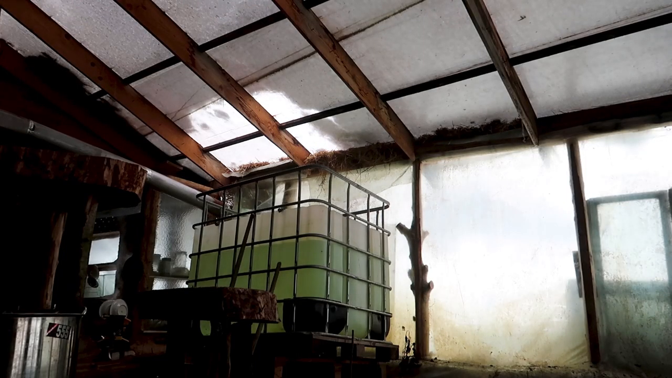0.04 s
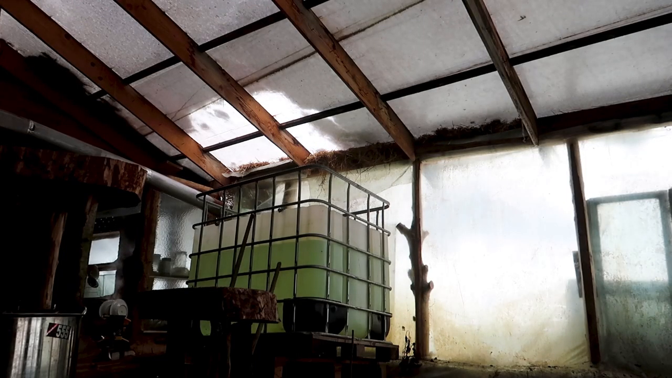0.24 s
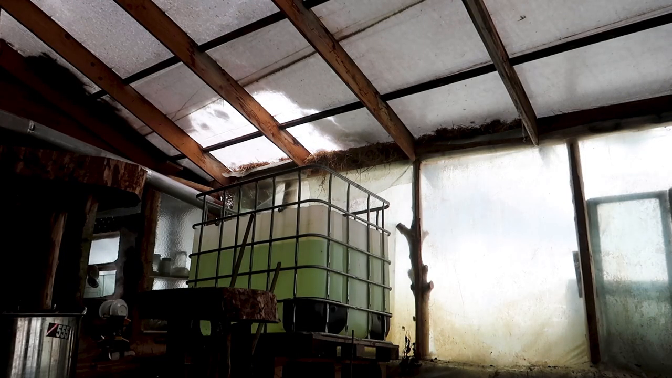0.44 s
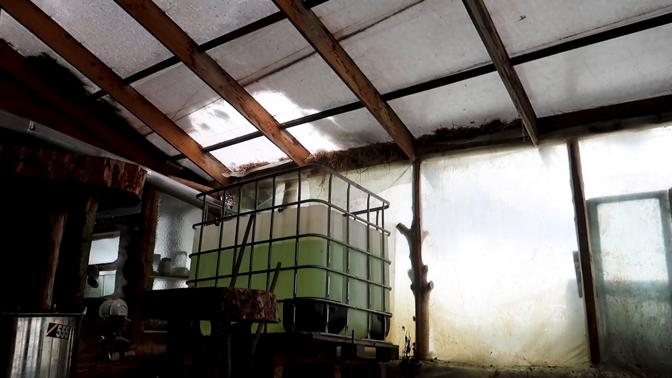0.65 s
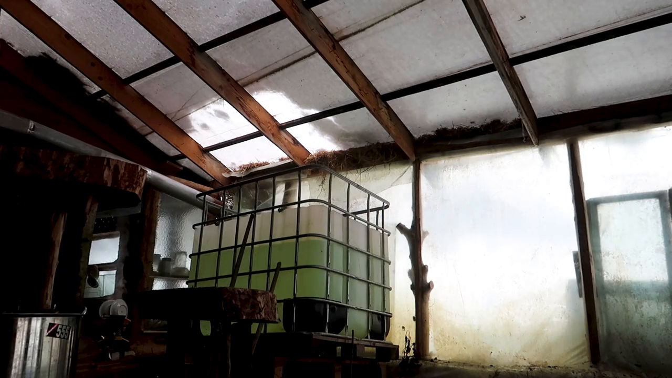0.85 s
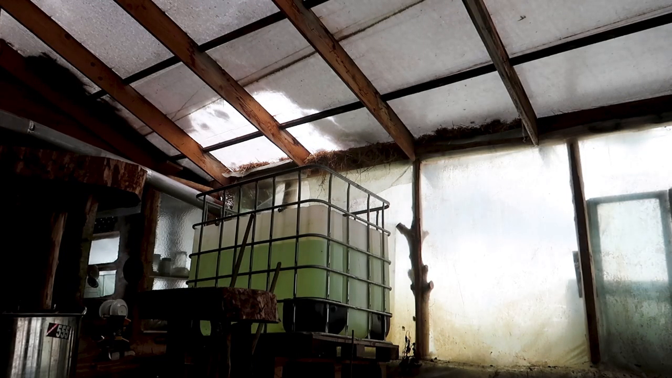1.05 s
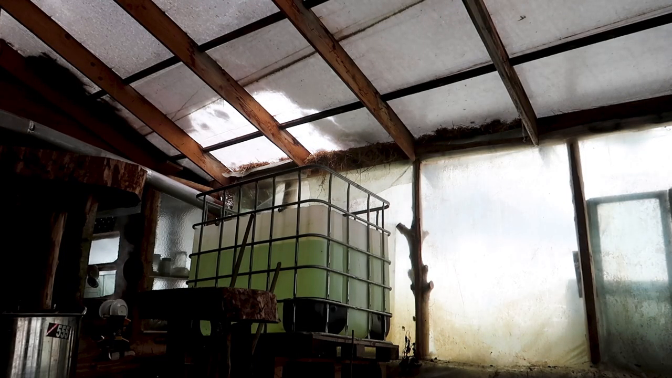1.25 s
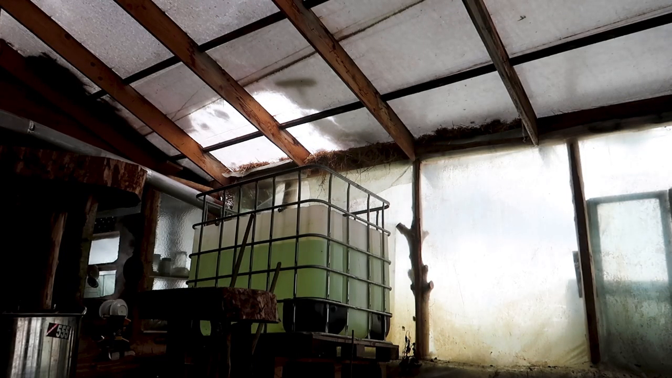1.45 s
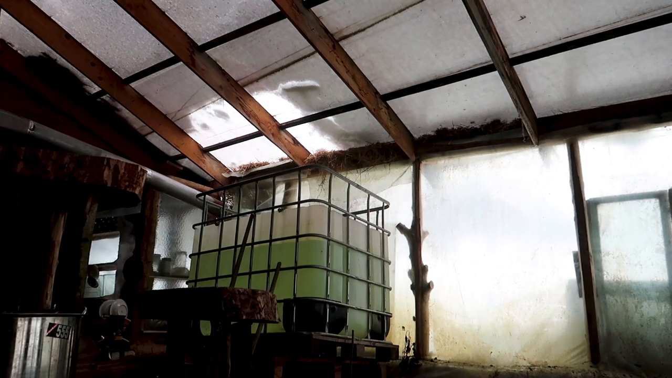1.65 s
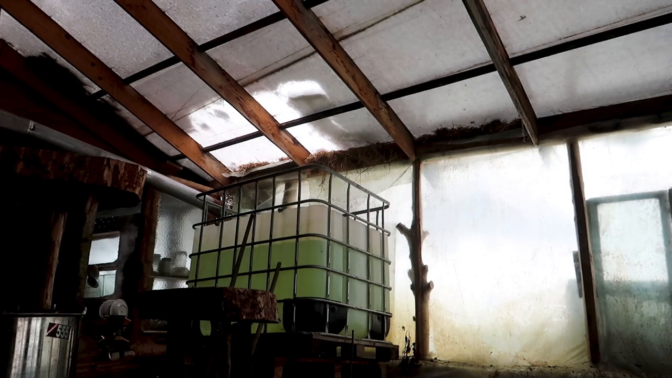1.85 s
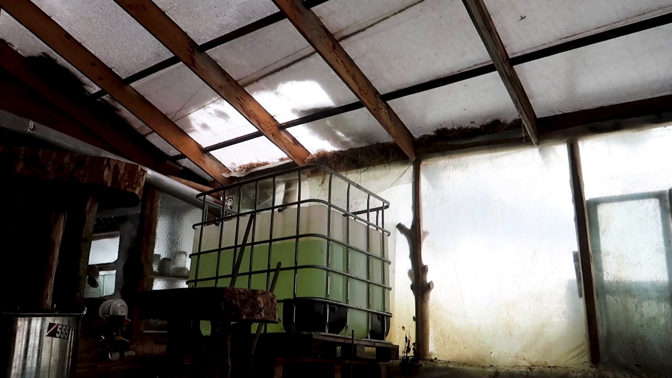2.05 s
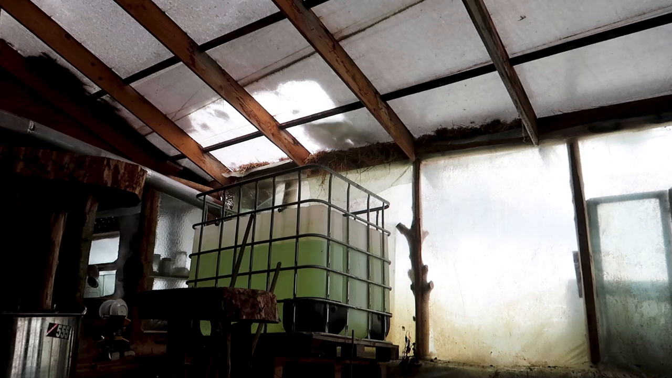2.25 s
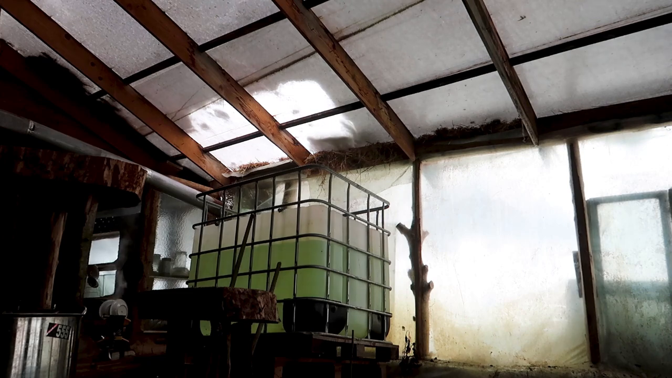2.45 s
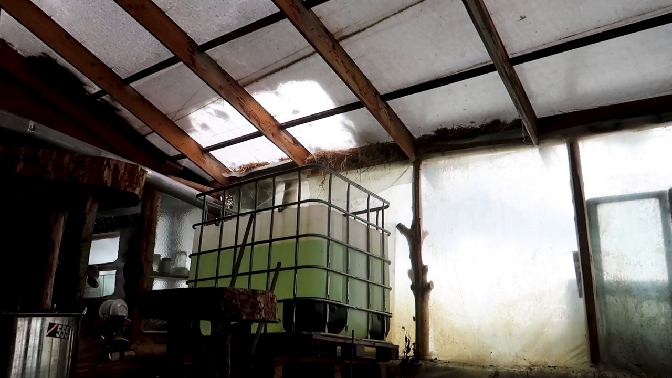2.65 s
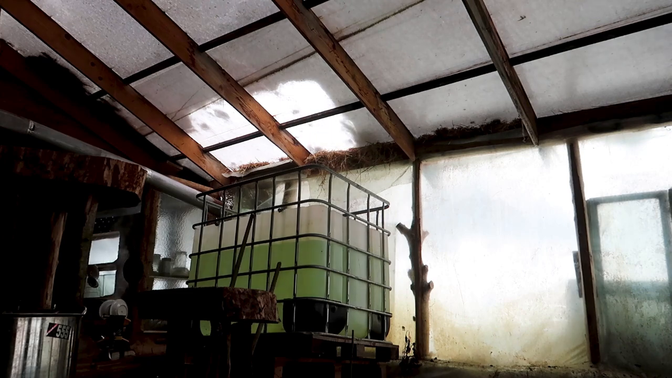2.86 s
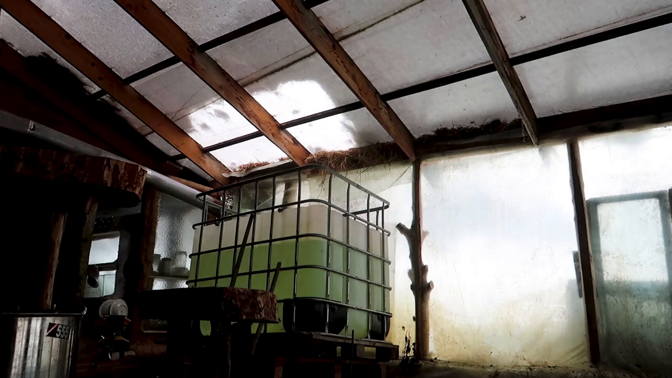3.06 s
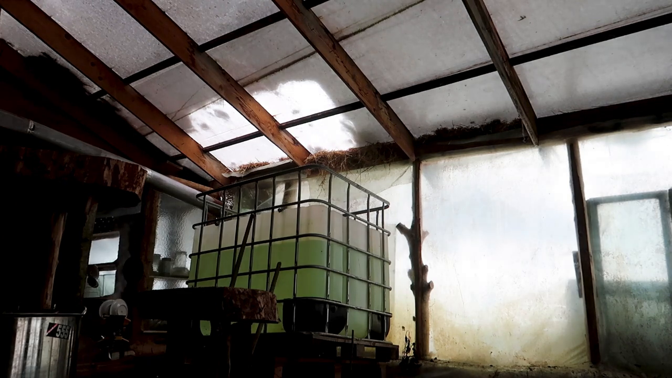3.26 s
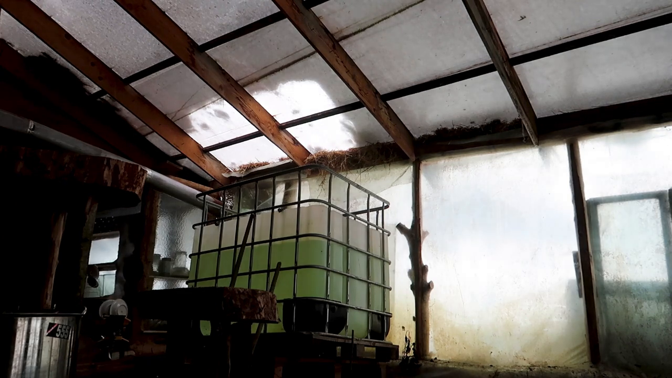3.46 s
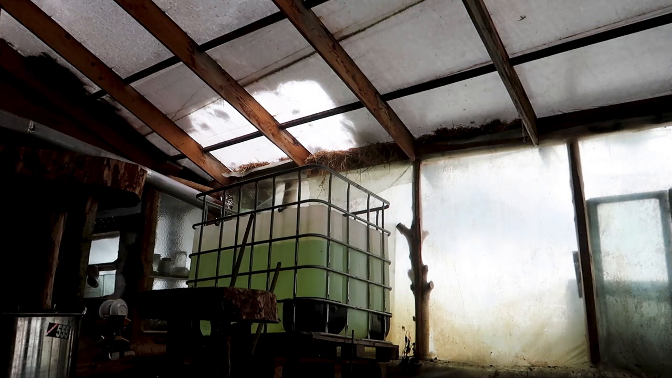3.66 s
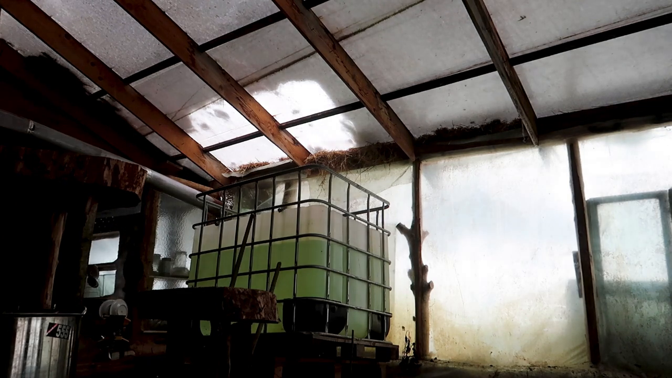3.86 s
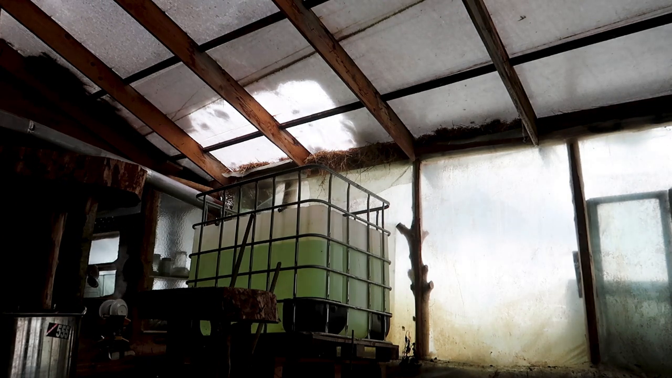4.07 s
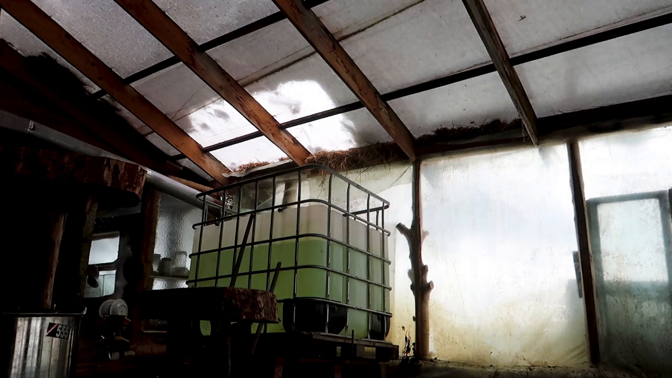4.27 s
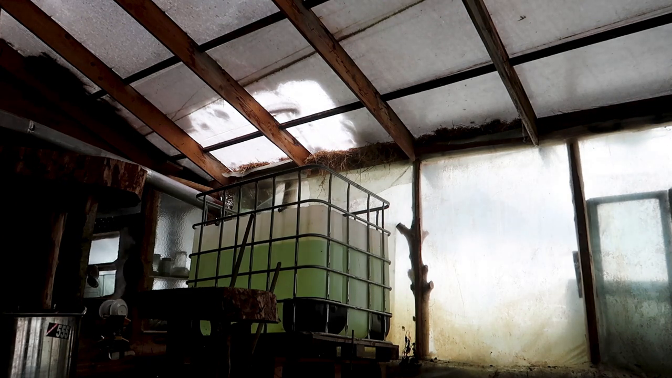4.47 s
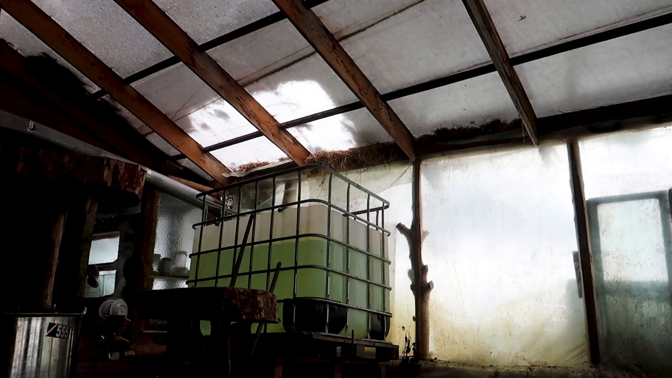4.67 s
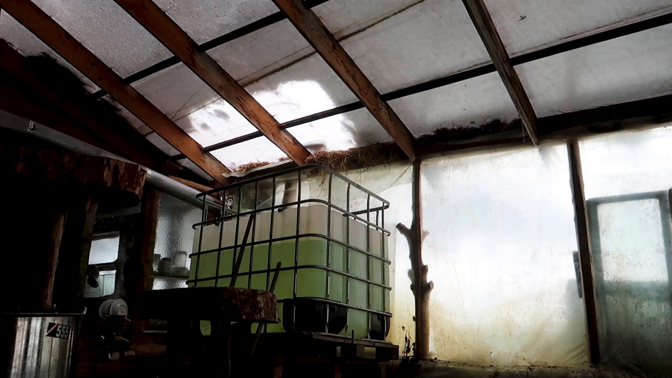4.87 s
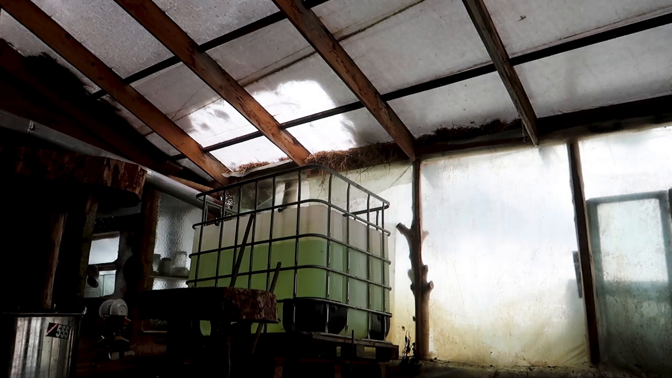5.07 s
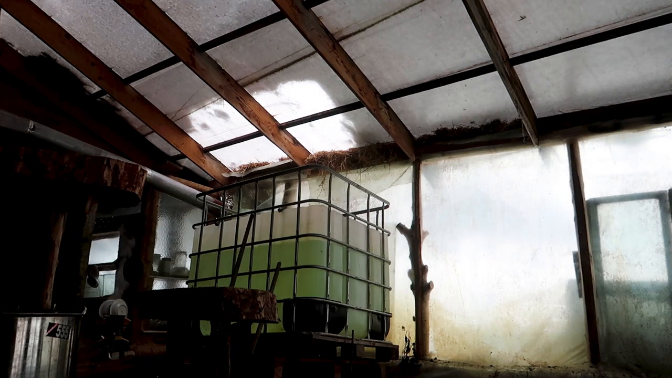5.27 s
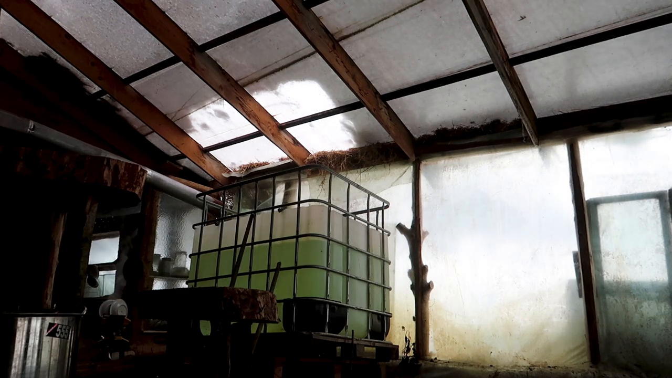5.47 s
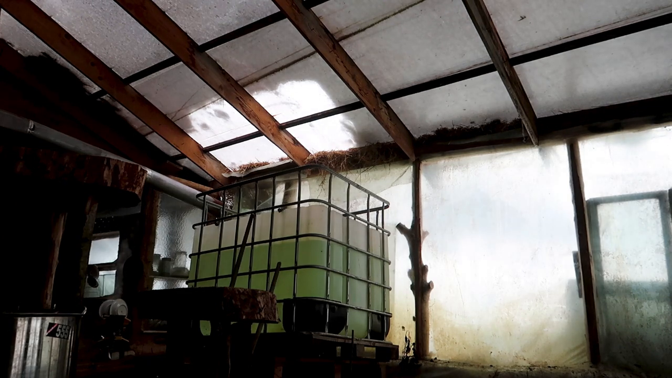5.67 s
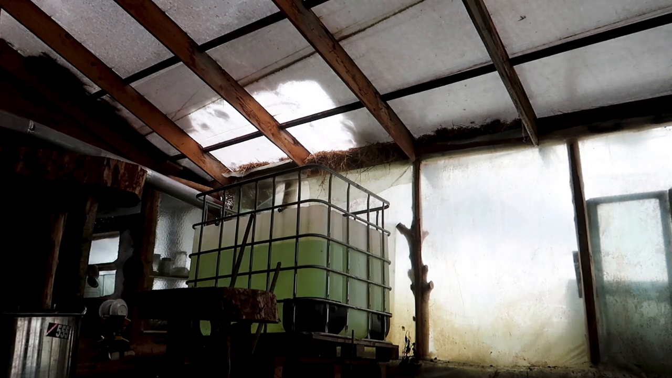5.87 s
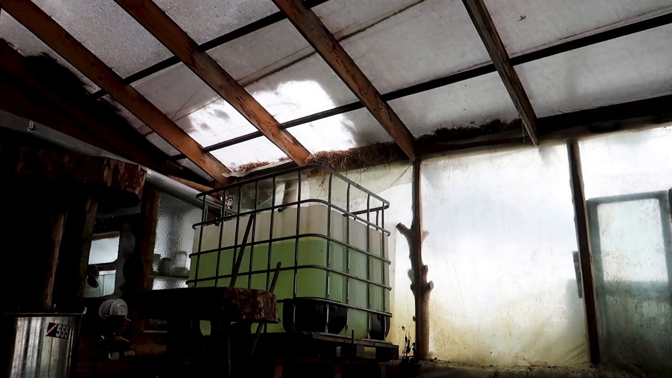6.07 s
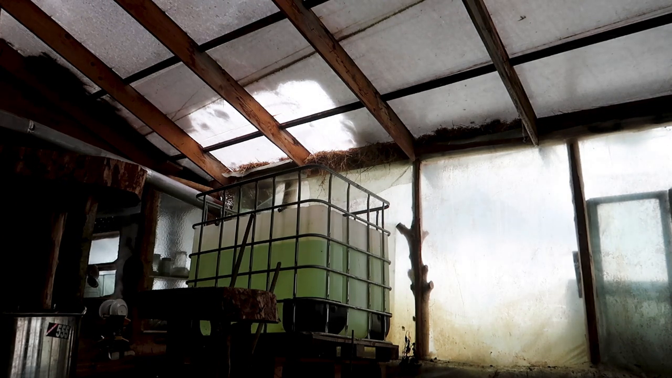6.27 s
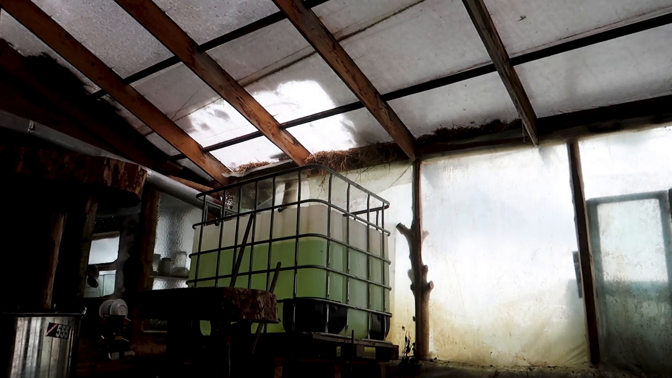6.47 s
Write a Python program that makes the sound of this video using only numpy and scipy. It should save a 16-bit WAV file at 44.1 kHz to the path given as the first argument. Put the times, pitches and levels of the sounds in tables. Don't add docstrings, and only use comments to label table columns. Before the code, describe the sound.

A tool knocks snow-laden roof panels, crust crunches, and slabs of snow scrape down with a grainy, fizzing hiss over hollow panel rumble.

```python
import sys
import numpy as np
from scipy import signal
from scipy.fft import rfft, irfft
from scipy.io import wavfile
from scipy.ndimage import uniform_filter1d

SR = 44100
rng = np.random.default_rng(int(sys.argv[2]) if len(sys.argv) > 2 else 0)


def digitize_waveform(pressure):
    field = np.atleast_2d(pressure).T
    bounded = np.clip(field, -1, 1)
    quanta = np.round(bounded * 32767).astype(np.int16)
    wavfile.write(sys.argv[1], SR, quanta)


def undo_db(level):
    steps = np.asarray(level, float) / 20
    return 10 ** steps


N = 287205
HZ = np.fft.rfftfreq(N, 1 / SR)


def evened(x):
    return x / np.sqrt(np.mean(x ** 2) + 1e-20)


def read(points, hz, axis=1):
    table = np.transpose(points)
    return np.interp(np.log(hz + 1), np.log(table[0] + 1), table[axis])


def add(mix, s, sound):
    part = mix[..., max(round(s * SR), 0):][..., :sound.shape[-1]]
    part += sound[..., :part.shape[-1]]


def mode(f, hz, width_hz):
    return 1 / (1 + 2j * (f - hz) / width_hz)


def shaped(x, gain):
    size = x.shape[-1]
    return irfft(rfft(x) * gain(np.fft.rfftfreq(size, 1 / SR)), size)


def panel(f):
    # (centre [Hz], width [Hz], level over the plain panel [dB])
    panel_modes = [(175.8, 8, 5.5), (246, 14, -3), (313.6, 14, 0), (350, 10.5, 0.5), (423.7, 12, 1.5),
                   (481, 35, -2.5), (587, 10.3, 2), (665, 24, -2), (788, 30, -4), (906, 15, -1),
                   (1106, 86, -8.5), (1357, 17, -7)]
    return 1 + sum(undo_db(db) * mode(f, hz, width) for hz, width, db in panel_modes)


def grit(size, per_s, spread_db, share):
    sizes = undo_db(spread_db * np.minimum(rng.exponential(1, (2, size)), 3))
    snaps = sizes * (rng.random((2, size)) < per_s / SR)
    crystals = evened(snaps * rng.choice([-1, 1], (2, size)))
    return np.sqrt(1 - share) * rng.standard_normal((2, size)) + np.sqrt(share) * crystals


def air():
    # (frequency [Hz], level per Hz [dB])
    air_colour = [(15, -58), (25, -8), (43, -3), (81, -7), (128, -7.5), (150, -20), (172, -4.5),
                  (309, -7.5), (335, -7), (450, -10.5), (729, -11.5), (903, -13), (2780, -18.5),
                  (7000, -28), (15000, -41.5)]
    # (frequency [Hz], left-right correlation)
    air_same = [(60, .995), (130, .9), (290, .05), (640, -.07), (3000, -.12), (14900, .0)]
    a, b = rfft(rng.standard_normal((2, N)))
    same = np.clip(read(air_same, HZ), -1, 1)
    both = np.array([a, same * a + np.sqrt(1 - same ** 2) * b])
    hiss = evened(irfft(both * undo_db(read(air_colour, HZ)), N))
    hum = evened(shaped(rng.standard_normal(N), lambda f: mode(f, 122, 6.4)))
    return undo_db(-54) * hiss + undo_db(-63.5) * hum


def blow(s, crunch_db, treble_db, rise, t60):
    # (frequency [Hz], level per Hz [dB])
    crunch = [(71, -45), (120, -4), (323, -4.5), (592, -6), (1440, -8), (1590, -10.5), (1990, -10),
              (2390, -14.5), (5140, -19), (14100, -53.5), (15000, -72)]
    t = np.arange(SR // 3) / SR

    def colour(f):
        treble = np.clip(np.log2((f + 1) / 900) / 2, 0, 1.4)
        return panel(f) * undo_db(read(crunch, f) + treble_db * treble)

    crust = evened(shaped(grit(len(t), 1500, 8.2, 0.18), colour))
    swell = np.minimum(0.44 + t / rise, 1)
    return s, undo_db(crunch_db - 60 * np.maximum(t - rise, 0) / t60) * swell * crust


def flexing():
    # (start [s], length [s], main mode level [dB], slow sway level [dB])
    leans = [(0.02, .05, -64, -60), (0.216, 0.33, -53, -47.5), (0.49, 0.16, -57, -52), (.84, .12, -55, -66),
             (1.31, 0.18, -52.5, -56), (1.57, 0.17, -51, -45), (1.646, 2, -53, -59),
             (1.97, 0.23, -43.5, -56.5), (2.394, .14, -38, -56), (2.502, .45, -45, -62),
             (2.906, 0.12, -49, -57), (3.25, 0.16, -50, -62), (3.418, .1, -58, -55), (3.55, 0.41, -52, -52),
             (3.857, 0.24, -50, -46), (4.133, 0.31, -60, -67), (4.406, 0.18, -39, -31),
             (4.554, 0.27, -56.5, -56), (4.963, .25, -46, -61), (4.7, 1.34, -55.5, -71),
             (5.678, 0.27, -51, -62), (6.117, 0.063, -50, -62), (6.197, 0.28, -48.5, -45.5)]
    rattle_db, rattle_top_db = -8, -58.5
    lumps_db, lump_s = 1.5, 0.035
    (a, b, c), push = rng.standard_normal((3, N)), np.zeros((3, N))
    for s, length, boom_db, sway_db in leans:
        levels = undo_db([[boom_db], [sway_db], [min(boom_db + rattle_db, rattle_top_db)]])
        add(push, s, levels * signal.windows.tukey(round(length * SR), 0.61))
    lumps = evened(uniform_filter1d(rng.standard_normal(N), round(lump_s * SR)))
    push = push * undo_db(lumps_db * lumps)
    boom = evened(shaped(a, lambda f: mode(f, 89, 14) * mode(f, 89, 42)))
    sway = evened(shaped(b, lambda f: mode(f, 57, 32) ** 2))
    rattle = evened(shaped(c, lambda f: panel(f) * mode(f, 277, 500) ** 2))
    return (push * [boom, undo_db(-5.5) * sway, rattle]).sum(0)


def bump(s, db, top_hz, t60):
    t = np.arange(SR // 3) / SR
    knock = rng.standard_normal((2, len(t))) * undo_db(-60 * t / t60)
    knock[:, :40] += 0.99 * signal.windows.hann(40)

    def padding(f):
        return panel(f) * (1j * f / (1j * f + 90)) ** 2 / (1 + 1j * f / top_hz) ** 3

    knock = shaped(knock, padding)
    return s, undo_db(db) * knock / abs(knock[0]).max()


def thump(s, db, hz, swell):
    t = np.arange(round(8 * swell * SR)) / SR
    envelope = t / swell * np.exp(1 - t / swell)
    return s, undo_db(db) * envelope * np.sin(-2 * np.pi * hz * t)


def squeak(s, db, hz, width_hz, length):
    t = np.arange(8192) / SR
    rub = rng.standard_normal((2, len(t))) * t / length * np.exp(-3 * t / length)
    rub = shaped(rub, lambda f: mode(f, hz, width_hz) ** 2)
    return s, undo_db(db) * rub / abs(rub[0]).max()


def slide(rows, weight_db, sag_db):
    # (frequency [Hz], level per Hz [dB])
    scrape_colour = [(70, -49), (120, -20), (170, -14), (250, -6), (345, -15), (420, -8), (640, -10.5),
                     (800, -10), (2800, -14.5), (6500, -21.5), (7800, -32.5), (10500, -39.5), (13800, -49),
                     (15200, -41)]
    # (time [s], extra level [dB], half width [s])
    catches = [(2.68, 2.5, 0.11), (3.23, 2.5, 0.018), (1.9, 1.5, .04), (2.1, 0, .03), (5.21, 3, 0.055),
               (5.39, 9, 0.024), (5.665, 3.5, .025)]
    s, *columns = np.transpose(rows)
    grains = grit(round((s[-1] - s[0]) * SR), 3000, 2.95, 0.24)
    hz, t, z = signal.stft(grains, SR, nperseg=512, noverlap=384)
    scrape_db, fizz_db = (np.interp(t + s[0], s, c) for c in columns)
    catch_db = sum(db * np.exp(-((t + s[0] - at) / half) ** 2) for at, db, half in catches)
    scrape_db = scrape_db + catch_db
    fizz_db = fizz_db - 0.96 * catch_db
    mid_span = np.sin(np.pi * np.clip(t / t[-1], 0, 1) ** 1.24)
    weight_db = weight_db + sag_db * mid_span - catch_db

    octave = np.log2((hz[:, None] + 1) / 900)
    treble = np.clip(octave / 2.78, 0, 1.4) ** 1.29
    bass = np.clip(-octave / 2.6, 0, 1.1)
    tilt_db = treble * (fizz_db + 4.5) + bass * (weight_db - 2)
    patches = uniform_filter1d(rng.standard_normal(z.shape[1:]), 5, 0)
    patches = evened(uniform_filter1d(patches, 14, 1))
    patch_db = (1.5 + 2.1 * np.clip(octave - 2.9, 0, 1)) * patches
    clumps = evened(uniform_filter1d(rng.standard_normal(len(t)), 6))
    colour_db = read(scrape_colour, hz)[:, None] + 21.5
    z = z * undo_db(colour_db + tilt_db + scrape_db + patch_db + 0.54 * clumps)
    sound = shaped(signal.istft(z, SR, nperseg=512, noverlap=384)[1], panel)
    return s[0], sound * signal.windows.tukey(sound.shape[1], .04)


def dwell(s, length, hz, db):
    size = round(length * SR)
    wander = rng.standard_normal((2, 2, SR // 2 + SR // 4))
    drift, flutter = evened(uniform_filter1d(wander, 900))[..., :size]
    turns = np.cumsum(hz + 7.0 * drift, 1) / SR + rng.random((2, 1))
    tone = undo_db(db - 1 + 2.4 * flutter) * np.sin(2 * np.pi * turns)
    return s, tone * signal.windows.tukey(size, .7) * [[1], [.5]]


def judder():
    # (time [s], slip rate [Hz], level [dB])
    slips = [
        (4.81, 137, -55),
        (4.85, 137, -49),
        (4.92, 145, -46.5),
        (4.97, 96, -66),
    ]
    multiples_db = [1, -6, -3, -4.5, -3]
    s, hz, db = np.transpose(slips)
    t = np.arange(s[0], s[-1], 1 / SR)
    wobble_hz = 2.8 * evened(uniform_filter1d(rng.standard_normal(len(t)), 400))
    turns = np.cumsum(np.interp(t, s, hz) + wobble_hz) / SR
    groan = sum(undo_db(g) * np.sin(2 * np.pi * k * turns) for k, g in enumerate(multiples_db, 1))
    return s[0], undo_db(np.interp(t, s, db)) * groan


def ports(pair):
    # (frequency [Hz], diffuse part [dB], phase [rad], left minus right [dB])
    port_pair = [(100, -32, 0., 0.), (200, -22, -.03, -.3), (380, -16, -.07, -.7), (700, -14, -.13, -1.2),
                 (1400, -7.5, -.3, -2.2), (3000, -3.5, -.7, -1.8), (5000, -1, -1.7, -1.),
                 (7500, -1.7, -2.8, -.4), (14000, -1.5, -3.1, 0.)]
    diffuse_db, phase, lean_db = (read(port_pair, HZ, axis=k) for k in (1, 2, 3))
    diffuse = np.minimum(undo_db(diffuse_db), 1)
    a, b = rfft(pair)
    right = np.sqrt(1 - diffuse ** 2) * a * np.exp(-1j * phase) + diffuse * b
    return irfft([a * undo_db(lean_db / 2), right * undo_db(-lean_db / 2)], N)


def scene():
    # (time [s], crunch [dB], treble re crunch [dB], rise [s], fade t60 [s])
    blow_rows = [
        (0.0, -45.5, -1.5, 0.0018, 0.17),
        (1.454, -29.5, 7, 0.033, 0.24),
        (1.552, -35, -5, 0.027, 0.11),
        (1.572, -33.5, 6.5, 0.018, 0.19),
        (4.41, -33, 14, 0.027, 0.11),
        (4.434, -26, 5, 0.013, 0.22),
        (5.376, -34.5, -7, 0.011, 0.05),
        (2.661, -37, -30, 0.032, 0.42),
        (5.649, -42, -3, 0.0086, 0.12),
    ]
    # (time [s], level [dB], top [Hz], fade t60 [s])
    bump_rows = [(.85, -42, 500, 0.12), (.875, -41, 500, 0.18), (.905, -42.5, 500, 0.14),
                 (1.323, -38.5, 800, 0.14), (1.369, -41.5, 500, 0.1), (4.285, -40, 393, 0.32),
                 (5.824, -33, 300, 0.25), (.28, -48.5, 400, 0.29), (.42, -44, 400, 0.49),
                 (1.02, -48, 250, .15), (3.9, -45.5, 400, 0.19), (4.17, -45, 300, 0.18),
                 (6.127, -53, 300, .12), (6.312, -41, 700, 0.13)]
    # (time [s], peak level [dB], pitch [Hz],
    # swell time [s])
    thump_rows = [(.41, -50, 76, 0.018), (0.852, -51, 280, 0.011), (.91, -56, 230, 0.0085),
                  (1.32, -47, 97, 0.014), (1.322, -42.5, 250, 0.0079), (1.372, -50, 332, 0.0068),
                  (1.456, -29.5, 86, 0.025), (1.5, -28.5, 41, 0.021), (1.53, -36, 21, 0.1),
                  (1.64, -36.5, 15.7, .15), (2.415, -28.5, 94, 0.031), (4.283, -41, 110, 0.0097),
                  (4.286, -41, 260, 0.0047), (4.414, -23.5, 84, 0.034), (4.51, -39, 35, 0.056),
                  (5.7001, -20.5, 900, 0.00061), (5.821, -39.5, 91, 0.015), (6.127, -42, 92, 0.014)]
    # (time [s], level [dB], centre [Hz], width [Hz], length [s])
    squeak_rows = [
        (4.737, -28, 2270, 540, 0.029),
        (4.74, -33, 2680, 600, 0.048),
        (1.454, -29, 5000, 6200, 0.011),
        (4.436, -29, 1900, 600, .03),
        (4.8, -43, 4700, 500, .09),
        (4.86, -43, 4530, 500, 0.098),
        (1.324, -50, 750, 400, .015),
    ]
    # (time [s], scrape level [dB], fizz re scrape, from speed [dB])
    slide_rows = [
        [(1.6, -46, -7), (1.9, -36, -1.5), (2.22, -33, -2), (2.55, -32, -4), (2.8, -31.5, -9),
         (2.97, -33.5, -17), (3.3, -36, -18), (3.55, -52.5, -17), (3.66, -68, -20)],
        [(4.53, -58.5, -1), (4.62, -53, 2), (4.72, -53.5, 10), (4.83, -43.5, 0), (4.96, -49.5, 5),
         (5.01, -49, 8)],
        [(4.97, -48, -7), (5.03, -34, -3), (5.085, -30.5, -9), (5.13, -35, -12), (5.3, -40, -12.5),
         (5.5, -37, -16), (5.77, -37, -18), (5.85, -42.5, -18), (5.99, -70, -12)],
    ]
    # (level re scrape [dB], extra at mid-span [dB])
    slab_loads = [
        (-1, 3),
        (6, -4),
        (-5, 1),
    ]
    # (time [s], length [s], mode
    # [Hz], level [dB])
    dwell_rows = [(1.68, 0.51, 492.5, -41.5), (1.795, 0.14, 424, -40), (1.9, 0.25, 172.5, -44),
                  (2.248, 0.49, 244.7, -38), (2.3, .7, 182.7, -39.5), (2.58, 0.13, 239, -30.5),
                  (2.621, 0.14, 413.3, -32), (2.66, 0.16, 490, -34.5), (2.758, 0.13, 587, -34),
                  (2.767, 0.22, 298, -32), (2.9, 0.15, 465, -41.5), (3.12, 0.19, 485, -35.5),
                  (3.092, 0.27, 299.8, -40), (4.425, 0.089, 350, -37), (4.432, 0.077, 176, -34),
                  (4.426, 0.044, 278, -29), (4.782, 0.096, 256, -41), (4.886, 0.088, 290, -43),
                  (4.819, 0.11, 708, -51), (4.996, 0.12, 580, -35), (5.047, 0.093, 665, -36),
                  (5.012, 0.12, 1050, -36), (5.248, .13, 312, -42), (5.432, 0.16, 305, -39.5),
                  (5.64, 0.06, 593, -40), (5.652, 0.037, 1015, -31), (5.696, 0.11, 1000, -41)]

    roof, low = np.zeros((2, N)), flexing()
    makers = ((blow, blow_rows), (bump, bump_rows), (squeak, squeak_rows), (dwell, dwell_rows))
    for make, table in makers:
        for row in table:
            add(roof, *make(*row))
    for rows, load in zip(slide_rows, slab_loads):
        add(roof, *slide(rows, *load))
    add(roof, *judder())
    for row in thump_rows:
        add(low, *thump(*row))
    return ports(roof) + low + air()


def top_cut(x):
    return signal.sosfilt(signal.butter(12, 15510, fs=SR, output="sos"), x)


def record(dry):
    return top_cut(dry)


dry = scene()
out = record(dry)
digitize_waveform(out)
```